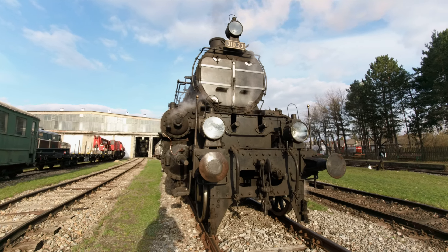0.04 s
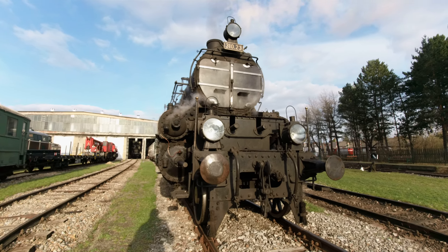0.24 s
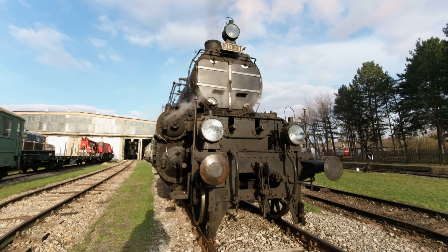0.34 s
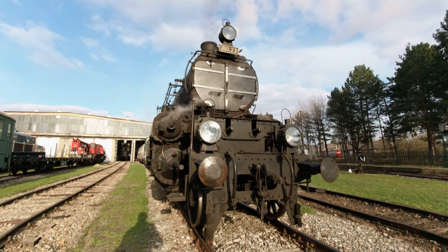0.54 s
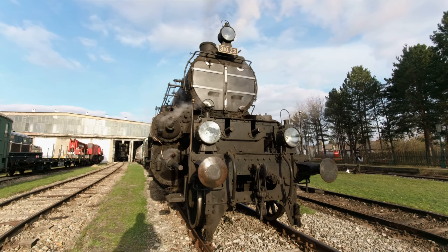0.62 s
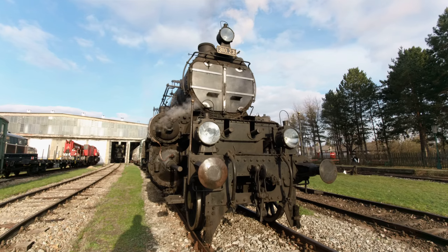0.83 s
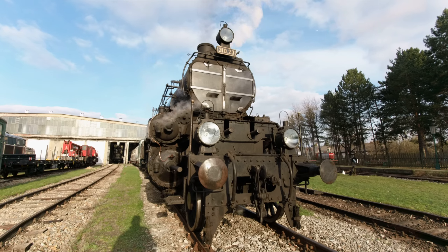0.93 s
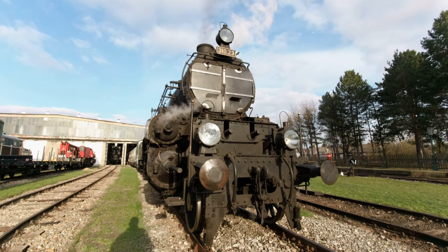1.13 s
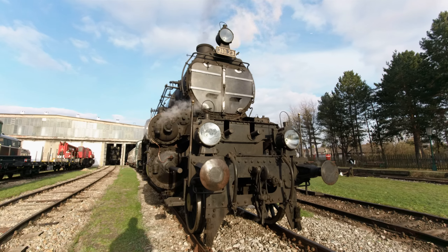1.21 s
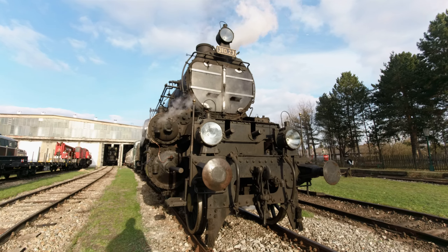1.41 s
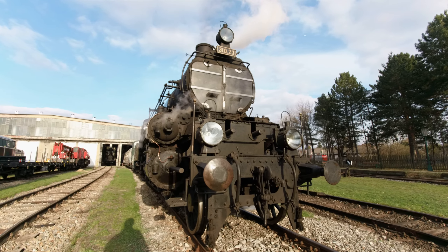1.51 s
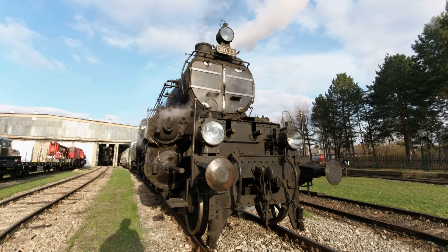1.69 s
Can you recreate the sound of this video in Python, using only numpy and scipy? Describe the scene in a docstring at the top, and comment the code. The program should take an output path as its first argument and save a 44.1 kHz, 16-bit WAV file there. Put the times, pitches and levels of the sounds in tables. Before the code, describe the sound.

Steam hisses steadily from a standing locomotive, with wind thumps and one soft chuff near the end

```python
"""A steady hiss, strongest on the left, spits twice early on while wind thumps, mostly at the left port.
The hiss is steam leaking from a locomotive that stands in a railway yard: noise with faint whistles.
Steam sighs through a resonant exhaust pipe, then one soft chuff drives it harder and starts to fade.
Gusts are low noise at each of two microphone ports; pipework rings briefly over a low drone of the yard."""
import sys
import numpy as np
from scipy.fft import rfft, irfft
from scipy.io import wavfile

SR = 44100
rng = np.random.default_rng(int(sys.argv[2]) if len(sys.argv) > 2 else 0)


def wrap_up_sound(samples):
    """Save the sound to the file named by the first command line argument, as 16-bit audio."""
    columns = np.atleast_2d(samples).T
    # keep every value between -1 and 1, then stretch to whole-number steps
    tamed = np.clip(columns, -1, 1)
    steps = np.round(tamed * 32767).astype(np.int16)
    wavfile.write(sys.argv[1], SR, steps)


N = 77175  # length in samples, 1.75 s
CHUFF_S = 1.166  # start of the chuff, in seconds


def undb(db):
    """Turn decibels into a plain multiplier."""
    return 10 ** (np.asarray(db) / 20)


def times():
    """Time of every sample, in seconds."""
    return np.arange(N) / SR


def freqs():
    """Frequencies of the spectrum in Hz, kept at 1 or more so that logarithms work."""
    return np.maximum(np.arange(N // 2 + 1) * SR / N, 1)


def curve(table, column=1):
    """A column of a table, joined by straight lines on a log-frequency axis."""
    table = np.array(table, float)
    return np.interp(np.log(freqs()), np.log(table[:, 0]), table[:, column])


def course(table):
    """A control joined by straight lines in time."""
    return np.interp(times(), *np.array(table, float).T)


def noise():
    """Spectrum of white noise at 0 dB per Hz."""
    return rfft(rng.standard_normal(N)) * np.sqrt(SR / 2)


def peak(hz, width):
    """Shape of one resonance: 1 at its centre, one half at half the width to either side."""
    return 1 / (1 + (2 * (freqs() - hz) / width) ** 2)


def walk(rate):
    """Smooth random wander with a spread of 1; a higher rate (Hz) wanders faster."""
    wander = irfft(noise() * np.exp(-(freqs() / rate) ** 2), N)
    return (wander - wander.mean()) / wander.std()


def swell(at, half):
    """A bell-shaped rise and fall around a moment, both in seconds."""
    return np.exp(-0.5 * ((times() - at) / half) ** 2)


def spray(table, colour=1):
    """Turbulent steam: separate noise at the left and right ports, coloured by columns 1 and 2."""
    ports = []
    for column in (1, 2):
        spectrum = noise() * colour * undb(curve(table, column))
        ports.append(irfft(spectrum, N))
    return np.array(ports)


def from_left(gain):
    """Noise of the given colour that reaches the left port first, partly scattered by the yard."""
    # How the right port hears the pipe. Each row: frequency in Hz, level in dB over the left port.
    right_colour = [(450, -0.5), (620, 7), (800, 9.5), (1050, 1), (1900, 0.5), (2350, 6), (2800, -2.5),
                    (4000, -3), (7000, -26)]
    # Sound that arrives scattered. Each row: frequency in Hz, share of the power from 0 to 1.
    scatter = [(400, .06), (1000, 0.24), (1500, 0.15), (1750, 0.06), (2000, 0), (2600, 0.37), (3500, 0.94)]
    lag_s, lag_from_hz, lag_full_hz = 0.0003, 530, 1377  # the bass has no lag
    f, direct = freqs(), noise()
    share = np.clip(curve(scatter), 0, 1)
    lag = lag_s * np.clip((f - lag_from_hz) / (lag_full_hz - lag_from_hz), 0, 1)
    right = undb(curve(right_colour)) * np.exp(-2j * np.pi * f * lag)  # turning the phase delays it
    ports = []
    for port in (1, right):
        mix = np.sqrt(1 - share) * direct + np.sqrt(share) * noise()
        ports.append(irfft(gain * port * mix, N))
    return np.array(ports)


def yard():
    """A low drone, the same at both ports: noise through one narrow resonance."""
    drone_hz, width_hz, drone_db = 40.86, 9.2, -64.5  # level in dB per Hz at the centre
    return irfft(noise() * peak(drone_hz, width_hz), N) * undb(drone_db)


def wind(port):
    """Eddies at one port (0 left, 1 right): the harder the gust, the smaller and higher they get."""
    # Wind gusts. Each row: middle in seconds, half length in seconds, left level in dB, right level in dB.
    gusts = [(0.078, .012, -41, -73), (0.16, 0.023, -47, -69), (0.242, 0.023, -39.5, -54.5),
             (0.277, 0.011, -30, -50), (0.315, 0.0078, -28.5, -45), (.328, 0.029, -24, -37.5),
             (0.362, 0.0078, -41, -40), (0.393, 0.014, -33, -40), (0.449, 0.022, -42.5, -42.5),
             (0.502, 0.016, -37, -45.5), (0.556, 0.045, -47, -47), (0.653, 0.015, -40, -49),
             (0.719, 0.0098, -28.5, -46), (0.751, 0.013, -36, -53), (0.909, 0.074, -43.5, -59.5),
             (0.973, 0.0082, -32, -47), (0.999, 0.0095, -34, -43.5), (1.029, 0.036, -42, -49.5),
             (1.39, 0.019, -47.5, -68), (1.457, 0.016, -41.5, -54)]
    breeze_db = (-56, -58)[port]  # the wind between gusts
    corner_at_35_hz = (166.6, 356)[port]  # where the treble starts to fall, for a force of -35 dB
    db_per_octave = 24.5  # extra force that raises the corner by an octave
    tilt_db, steepness = 4.0, 5.32  # tilt in dB per tenfold frequency; power of the treble fall

    power = undb(breeze_db) ** 2
    for row in gusts:
        power = power + (undb(row[2 + port]) * swell(row[0], row[1])) ** 2
    force = np.sqrt(power)
    corner = corner_at_35_hz * 2 ** ((20 * np.log10(force) + 35) / db_per_octave)

    # Half-octave bands let the colour follow the force from moment to moment.
    centres = 22 * 2 ** np.arange(0, 6.5, 0.5)
    eddies, eddy_power = 0, 0
    for hz in centres:
        band = irfft(noise() * np.exp(-(2 * np.log2(freqs() / hz)) ** 2), N)
        tilt = undb(tilt_db * np.log10(hz / centres[0]))
        gain = tilt / np.sqrt(1 + (hz / corner) ** steepness)
        eddies = eddies + gain * band / band.std()
        eddy_power = eddy_power + gain ** 2
    return force * eddies / np.sqrt(eddy_power)


def pipework():
    """Two narrow resonances, fed with noise, sing faintly for a moment."""
    # Ringing pipework. Each row: frequency in Hz, width in Hz, level in dB per Hz at the height of the ring.
    ring = [(1048, 7.7, -68), (1197, 14, -80.5)]
    colour = sum(undb(db) * peak(hz, width) for hz, width, db in ring)
    return from_left(colour) * swell(at=0.71, half=0.036)


def patchy(sound, db):
    """Each half octave of the treble wavers on its own, alike at both ports."""
    octave = np.clip(np.log2(freqs() / 2000), 0, 3)  # octaves above 2000 Hz
    spectrum = rfft(sound)
    total = 0
    for k in range(7):
        band_shape = np.maximum(1 - abs(2 * octave - k), 0)  # overlapping triangles
        total = total + irfft(spectrum * band_shape, N) * undb(db * walk(23))
    return total


def leak():
    """Steam forced through a gap: a steady, faintly whistling hiss that wavers and spits."""
    # Leaking steam before whistles and wavering. Each row: frequency in Hz, left and right in dB per Hz.
    hiss = [(2000, -124, -126), (2450, -104, -107), (3200, -101, -105), (4000, -100.5, -102),
            (4980, -99, -104), (5130, -98, -100), (5740, -97, -99), (7030, -92.5, -105), (7800, -94, -105),
            (7730, -92.5, -103), (8900, -98, -103), (9830, -100, -104), (13200, -104, -110),
            (14600, -101, -107), (16800, -102, -108)]
    # Resonances of the leak. Each row: frequency in Hz, width in Hz, lift in dB.
    whistles = [(3850, 160, 3.5), (7720, 200, 6), (11300, 640, 1)]
    # Slow changes of the hiss. Each row: time in seconds, level change in dB.
    hiss_level = [(0, 0.5), (.3, 1), (.66, -1.5), (.92, 1), (1.15, 1), (1.45, -4), (1.75, -1)]
    # Spits of water in the leak. Each row: middle in seconds, half length in seconds, dB over the plain hiss.
    spit_times = [(0.057, 0.00096, 13), (0.126, 0.0037, 2), (0.136, 0.0054, 7.5), (0.1444, 0.001, 17.5),
                  (0.152, 0.003, 3)]
    patchy_db, flicker_db = 0.86, 0.52
    spit_hz, spit_octaves = 6460, 0.66  # centre and spread of the spits

    flow = undb(course(hiss_level) + flicker_db * walk(60))
    whistle = undb(sum(db * peak(hz, width) for hz, width, db in whistles))
    steady = patchy(spray(hiss, whistle), patchy_db) * flow
    bursts = sum(undb(db) * swell(at, half) for at, half, db in spit_times)
    focus = np.exp(-0.5 * (np.log2(freqs() / spit_hz) / spit_octaves) ** 2)
    return steady + spray(hiss, focus) * bursts


def chuff(attack, hold, fade_db):
    """Flow after the valve opens: rise and hold in seconds, then a fade in dB per second."""
    t = times() - CHUFF_S
    rise = np.clip(t / attack, 0, 1)
    return rise * undb(-fade_db * np.maximum(t - attack - hold, 0))


def hollow():
    """The chuff's hollow note: narrow resonances of the pipe that glide upward as it fades."""
    # Each row: frequency at the chuff's start in Hz, width in Hz, right-port rms level in dB at full flow.
    notes = [(786, 37, -60.5), (841, 14, -58)]
    rise_hz_per_s = 200.4
    t, tone = times() - CHUFF_S, 0
    for hz, width, db in notes:
        phase = 2 * np.pi * np.cumsum(hz + rise_hz_per_s * t) / SR
        # Two random wanders on a cosine and a sine make a narrow band of noise.
        tone = tone + undb(db) * (walk(width) * np.cos(phase) + walk(width) * np.sin(phase))
    balance = undb([[-6], [0]])  # left, right in dB
    return balance * tone * chuff(attack=0.019, hold=0.18, fade_db=31)


def jet():
    """The bright jet at the valve that opens the chuff."""
    # Jet before its lift. Each row: frequency in Hz, left level and right level in dB per Hz.
    jet_colour = [(1950, -118, -118), (2570, -85, -100), (3440, -91.5, -93.5), (5600, -94.5, -97.5),
                  (7740, -90.5, -102), (9600, -101, -102), (12400, -107, -114), (16000, -110, -118)]
    lift_db = 2
    return spray(jet_colour) * undb(lift_db) * chuff(attack=0.022, hold=0.19, fade_db=25.5)


def exhaust():
    """Steam idles through the resonant pipe; the chuff drives it harder and adds a bright jet."""
    # Steam in the pipe before resonances and flow. Each row: frequency in Hz, level in dB per Hz.
    pipe = [(100, -102), (200, -81), (330, -85), (520, -88), (1000, -85), (1600, -83), (1850, -87.5),
            (2030, -90.5), (2300, -87), (2600, -87.5), (3400, -99), (5000, -103.5), (9000, -106),
            (16000, -118)]
    # Pipe resonances. Each row: frequency in Hz, width in Hz, lift in dB.
    pipe_modes = [(207, 120, 4), (295, 26, 3), (427, 75, 11.5), (752, 17, 10), (817, 10.6, 4.5),
                  (856, 49, 1.5), (1063, 19, 7), (1188, 37, 6.5), (2402, 55, 7), (2660, 74, 1.5),
                  (2710, 14, 7)]
    # Idling steam before flutter. Each row: time in seconds, flow in dB.
    idle = [(0, -14.5), (.3, -14.5), (.5, -10), (.63, -12.5), (.68, -9), (.75, -13), (.9, -13.5),
            (1.15, -14), (1.75, -11.5)]
    chuff_db, flutter_db = -0.5, 0.91

    resonances = sum(db * peak(hz, width) for hz, width, db in pipe_modes)
    body = undb(curve(pipe) + resonances)
    blow = undb(chuff_db) * chuff(attack=0.053, hold=0.081, fade_db=22.5)
    flow = np.hypot(undb(course(idle)), blow)  # the two add as power
    flutter = undb(flutter_db * walk(25))
    return from_left(body) * flow * flutter + hollow() + jet()


def scene():
    """All the sources together, left and right."""
    gusty_wind = np.array([wind(port=0), wind(port=1)])
    return yard() + gusty_wind + pipework() + leak() + exhaust()


def record(dry):
    """The recorder cuts the top sharply at 15800 Hz."""
    top_hz = 15800
    return irfft(rfft(dry) / np.sqrt(1 + (freqs() / top_hz) ** 400), N)


dry = scene()
out = record(dry)
wrap_up_sound(out)
```